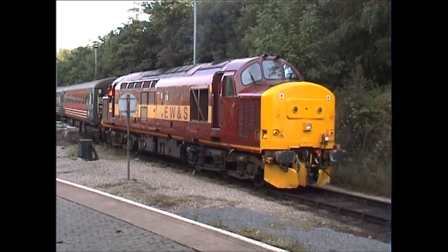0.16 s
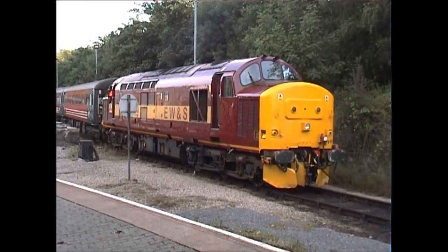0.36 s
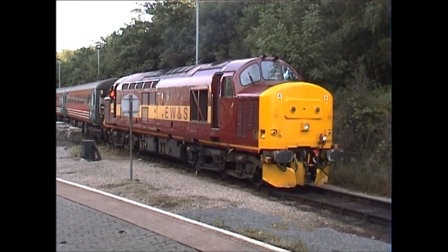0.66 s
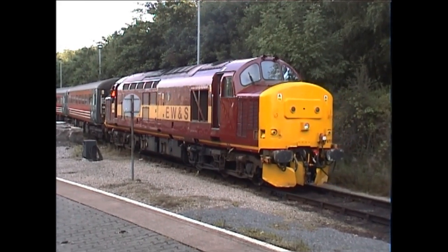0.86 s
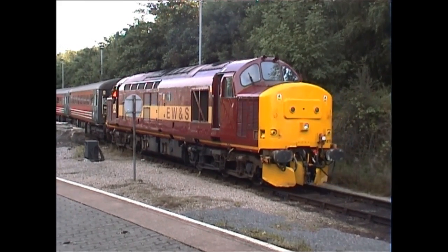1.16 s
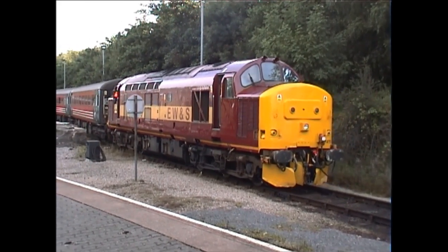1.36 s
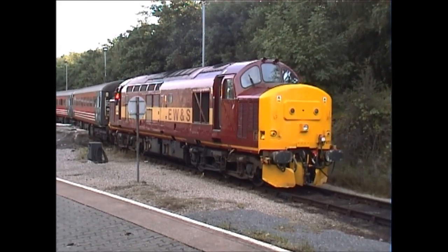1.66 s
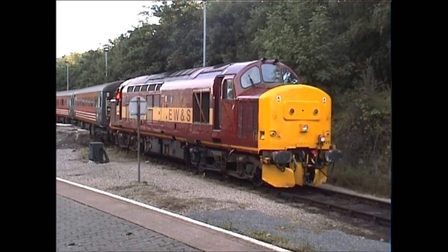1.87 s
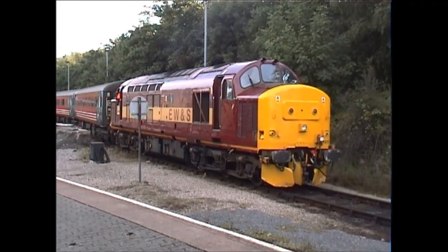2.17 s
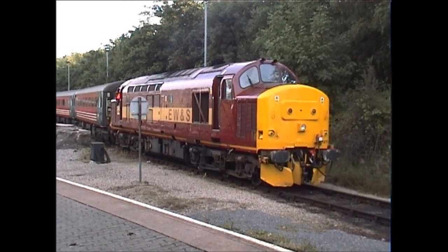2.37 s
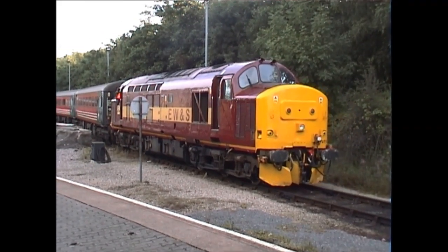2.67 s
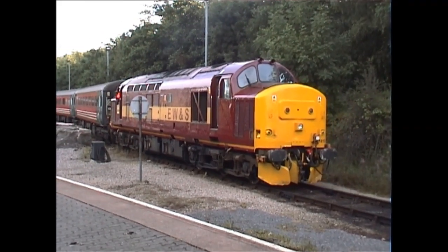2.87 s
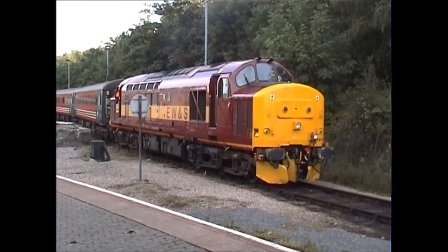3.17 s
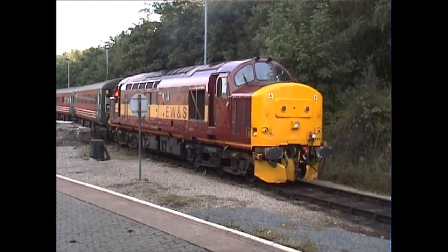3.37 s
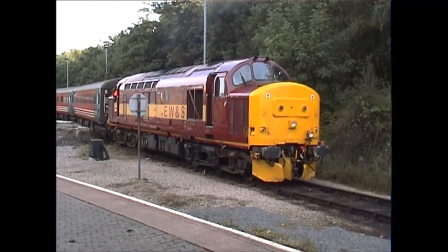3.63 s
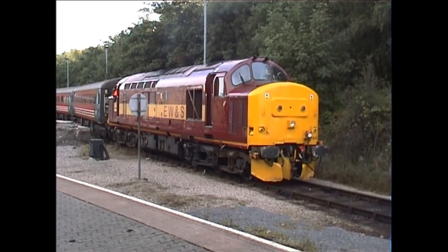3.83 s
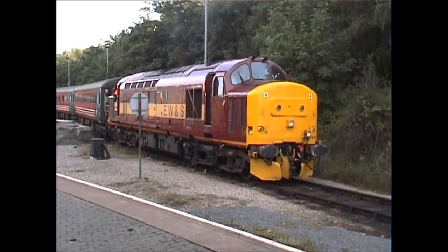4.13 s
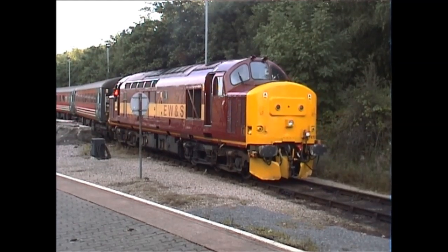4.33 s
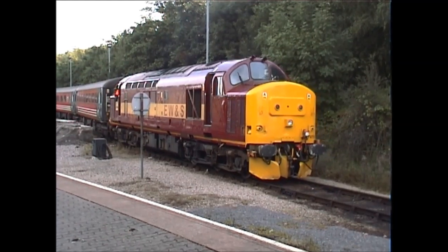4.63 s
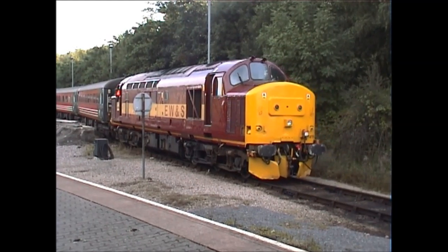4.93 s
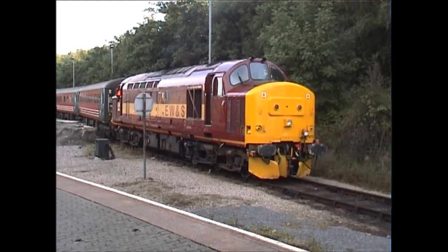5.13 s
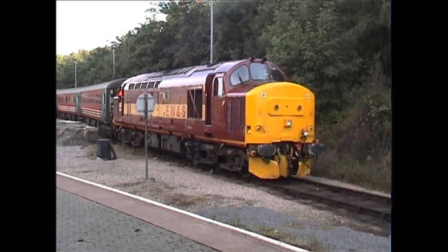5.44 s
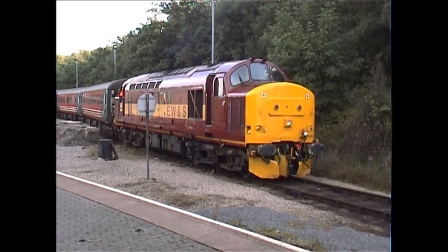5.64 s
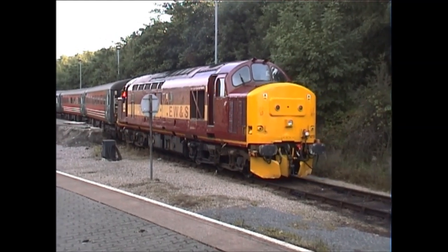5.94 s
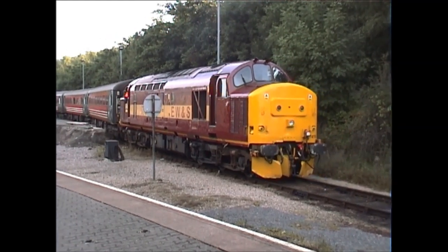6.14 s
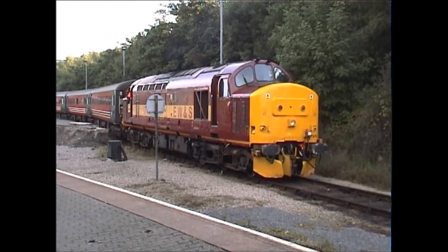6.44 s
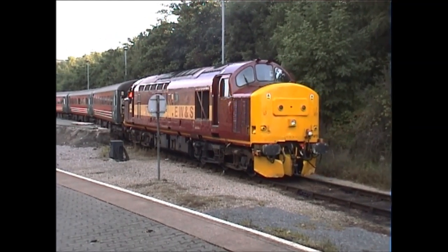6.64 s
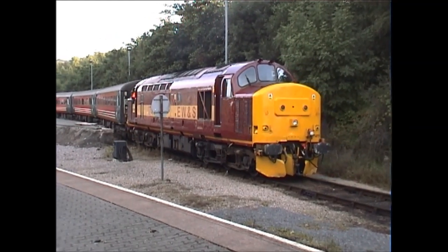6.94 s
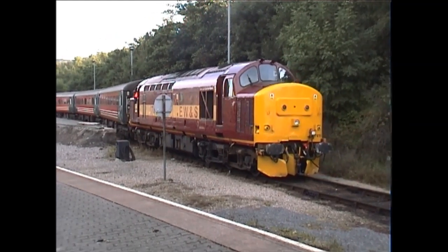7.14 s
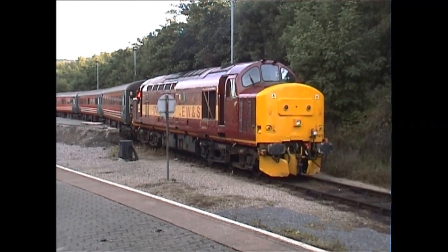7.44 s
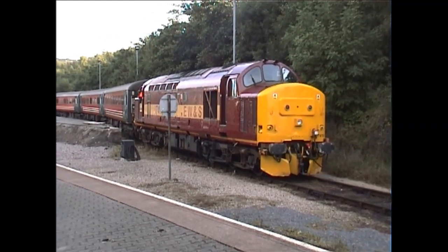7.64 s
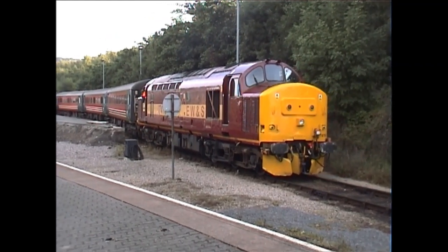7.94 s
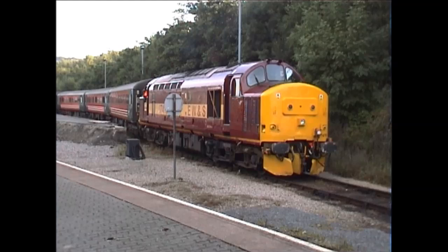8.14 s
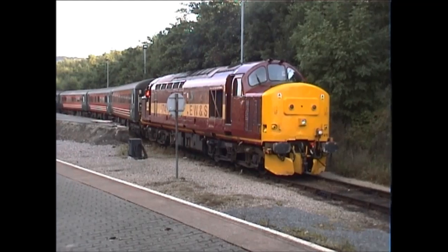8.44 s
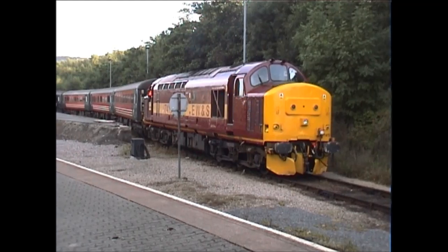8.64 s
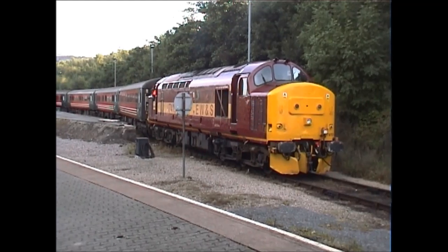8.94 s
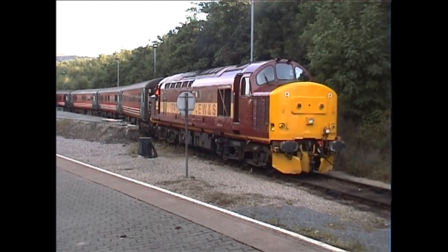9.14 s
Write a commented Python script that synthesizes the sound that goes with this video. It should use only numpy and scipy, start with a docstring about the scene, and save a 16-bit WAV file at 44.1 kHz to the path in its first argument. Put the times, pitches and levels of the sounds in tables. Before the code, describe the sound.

A diesel locomotive creeps along beside a station platform, its engine idling with an uneven throb, a steady whine and fan roar. A brief metallic clank comes at the start, followed by one short hiss of air and later two sharp ticks. High-pitched wheel squeals swell and break off throughout, with light grinding, growing busiest near the end. It is heard in stereo from the platform.

```python
"""A station platform, along which an idling twelve-cylinder diesel locomotive creeps, heard in stereo.
Uneven firing pulses excite the resonances of its stacks and panels, over generator whine and fan roar.
A brief metallic clank comes near the start, then one hiss of escaping air, and valves tick twice.
Above all this the wheels squeal: stick-slip friction on the rail drives each into self-excited
vibration at one of its own modes."""
import sys
import numpy as np
from scipy import signal
from scipy.fft import rfft, irfft
from scipy.io import wavfile
from scipy.ndimage import uniform_filter1d

SR = 44100
rng = np.random.default_rng(int(sys.argv[2]) if len(sys.argv) > 2 else 0)


def pcm_store(signal):
    """Save signal as 16-bit PCM."""
    levels = np.round(np.clip(np.atleast_2d(signal), -1, 1) * 32767)
    wavfile.write(sys.argv[1], SR, levels.astype(np.int16).T)


N = 410130
T = np.arange(N) / SR
GRID_S = np.arange(0, N / SR + .002, .001)  # envelope times, a millisecond apart

# noise spectrum of the clank, air, ticks and grinding: frequency_hz, relative_density_db
BRIGHT_SPECTRUM = [(900, 4), (2000, 3.5), (5000, 5), (8000, 5), (11000, -3), (15000, -30)]


def amp(db):
    """Amplitude ratio of a level in decibels."""
    return 10 ** (np.asarray(db) / 20)


def unit_rms(x):
    """Normalisation to unit power."""
    return x / np.sqrt(np.mean(x ** 2) + 1e-20)


def curve_at(points, hz):
    """Interpolation on a logarithmic frequency axis."""
    point_hz, value = np.transpose(points)
    return np.interp(np.log(hz + 1), np.log(point_hz + 1), value)


def smooth(x, ms):
    return np.interp(T, GRID_S, uniform_filter1d(x, size=ms))


def drift(hz, at=None):
    """Random modulation: noise of rms 1, low-passed at hz and read at the given samples."""
    pole = np.exp(-2 * np.pi * hz * 32 / SR)
    slow = unit_rms(signal.lfilter([1], np.poly([pole] * 3), rng.standard_normal(N // 32 + 2)))
    return np.interp((np.arange(N) if at is None else at) / 32, np.arange(len(slow)), slow)


def resonate(x, hz, width_hz):
    """Forced response of a damped two-pole resonator."""
    r = np.exp(-np.pi * width_hz / SR)
    return signal.lfilter([1 - r], [1, -2 * r * np.cos(2 * np.pi * hz / SR), r * r], x)


def noise(spectrum, patchy_db):
    """Partly coherent stereo noise of rms 1, its level drifting in patches of time and frequency."""
    # likeness of left and right: frequency_hz, correlation
    coherence = [(60, .98), (380, .82), (2380, .77), (15000, .88)]
    frames, hz = N // 256 + 5, np.fft.rfftfreq(1024, 1 / SR)
    a, b, c, d, patches = rng.standard_normal((frames, 513, 5)).T
    patches = unit_rms(uniform_filter1d(uniform_filter1d(patches, size=12, axis=0), size=14, axis=1))
    shared = curve_at(coherence, hz)[:, None]
    left, independent = a + 1j * b, c + 1j * d
    bins = np.array([left, shared * left + np.sqrt(1 - shared ** 2) * independent])
    bins *= amp(curve_at(spectrum, hz)[:, None] + patchy_db * patches)
    return unit_rms(signal.istft(bins, nperseg=1024, noverlap=768)[1][:, :N])


def roar():
    """Fan turbulence and rolling contact radiate steady broadband noise."""
    # fans and rolling: frequency_hz, relative_density_db
    roar_spectrum = [(20, -46), (59, -22), (130, -19), (160, 0.5), (330, -5), (530, -12.5), (800, -3.5),
                     (1300, -16), (1600, -11), (3950, -26), (9100, -28.5), (11400, -36.5), (15400, -56)]
    return amp(-25) * noise(roar_spectrum, patchy_db=1.23)


def harmonic(cycles, order, rms_db, wobble_turns=0):
    """A sinusoid locked to a multiple of the engine's cycle rate."""
    return np.sqrt(2) * amp(rms_db) * np.cos(2 * np.pi * (order * cycles + rng.random() + wobble_turns))


def drone(cycles):
    """Periodic engine motion radiates a harmonic series."""
    # successive harmonics of the cycle rate: level_db
    order_levels = [-48.2, -60.0, -60.0, -47.8, -60.0, -57.9, -47.3, -54.9, -47.7, -34.3, -49.2, -42.7,
                    -44.7, -44.4, -46.2, -45.5, -42.8, -48.5, -43.2, -52.3, -46.8, -52.7, -44.5, -54.4,
                    -49.0, -46.3, -50.7, -40.8, -52.6]
    return sum(harmonic(cycles, order, db) for order, db in enumerate(order_levels, start=9))


def generator(cycles):
    """Passing slots make a whine of high harmonics, slightly modulated in level and phase."""
    # slot tones: cycle_multiple, level_db
    slot_tones = [(102, -33.5), (136, -47), (170, -34), (204, -42.5)]
    return sum(harmonic(cycles, order, db + 1.5 * drift(6), .0013 * order * drift(2.5))
               for order, db in slot_tones)


def exhaust(cycles):
    """Impulse excitation: each firing rings stacks and panels with a thump and a dying burst of gas."""
    # exhaust beats in firing order: strength_db
    cylinders = [-6, -6, -8, 1, -5, -4, -5, 5, -3, -4, -7, 3.5]
    # stack and panel resonances: pitch_hz, width_hz, level_db, strength_exponent, beats_ahead
    resonances = [(228.5, 20.7, -31.5, 0.28, 0), (306.6, 44.6, -29, 1.02, 0), (639.4, 48, -33, 0.16, 4),
                  (973, 59, -36.5, 1.45, 4)]
    beat = np.floor(cycles * len(cylinders) + .15 + .04 * drift(12)).astype(int)  # firing times scatter
    scatter_db = 1.2 * rng.standard_normal(N)[beat]
    thumps = np.diff(beat, prepend=beat[0])
    gas = signal.lfilter([1], [1, -np.exp(-1 / (.015 * SR))], thumps) * rng.standard_normal(N)
    pulses = 1.7 * unit_rms(thumps) + unit_rms(gas)
    out = 0
    for hz, width_hz, db, exponent, ahead in resonances:
        strength = amp(np.array(cylinders)[(beat + ahead) % len(cylinders)] + scatter_db)
        drive = np.gradient(pulses * strength ** exponent)
        ringing = resonate(resonate(drive, hz, 1.5 * width_hz), hz, 1.5 * width_hz)
        out += amp(db) * unit_rms(ringing)
    return out


def engine():
    """Superposition of three crank-locked sources and the roar, a little louder on the left."""
    # idle speed, two crank turns to a cycle: time_s, cycle_rate_hz
    speed = [(1, 3.6373), (3, 3.6335), (5, 3.6312), (7, 3.6361)]
    # level difference between the ears: frequency_hz, left_minus_right_db
    balance = [(60, 2.5), (380, 1), (2380, 1), (15000, 4.5)]
    cycles = np.cumsum(np.interp(T, *np.transpose(speed))) / SR
    sound = drone(cycles) + generator(cycles) + exhaust(cycles) + roar()
    balance_db = curve_at(balance, np.fft.rfftfreq(N, 1 / SR))
    return irfft(rfft(sound) * amp(np.outer([.5, -.5], balance_db)), N)


ATTACK_DB_PER_S, RELEASE_DB_PER_S = 1600, 750


def arch(start, swell, fall, peak_db):
    """Envelope in dB: a rounded arch between exponential growth and decay."""
    past_peak = GRID_S - start - swell
    from_peak = np.minimum(abs(past_peak) / np.where(past_peak < 0, swell, fall), 1)
    ends_db = np.maximum(ATTACK_DB_PER_S * (start - GRID_S), RELEASE_DB_PER_S * (past_peak - fall))
    return peak_db - 8.5 * from_peak ** 1.34 - np.maximum(ends_db, 0)


def clank_air_and_ticks():
    """Broadband transients: a metallic clank, a turbulent air jet, valve ticks that ring a housing."""
    # the brief clank, then the hiss of escaping air: start_s, swell_s, fall_s, peak_db
    bursts = [(.238, 0.012, 0.05, -28), (2.24, 0.083, 0.26, -26.5)]
    # valve ticks: start_s, level_db, t60_ms
    ticks = [(3.164, -15, 6), (5.988, -19, 5)]
    envelope = smooth(sum(amp(arch(*burst)) for burst in bursts), ms=4)
    housing = 0
    for start, db, t60_ms in ticks:
        age = np.maximum(T - start, 0)
        snap, tail = amp(-60e3 * age / t60_ms), .29 * amp(-60 * age / .09)
        envelope += (T > start) * amp(db) * (snap + tail)
        housing += amp(db + 7.5 - 60 * age / .0061) * np.sin(2 * np.pi * 2500 * age)
    return noise(BRIGHT_SPECTRUM, patchy_db=1.5) * envelope + housing


def grinding(rubbing):
    """Sliding friction makes a hiss that grows with the strength of the rubbing."""
    return amp(-31) * noise(BRIGHT_SPECTRUM, patchy_db=5.5) * uniform_filter1d(rubbing, size=900) ** .81


def wheel_for(hz):
    """Each wheel has its own band of natural frequencies; the first match takes the pitch."""
    # ringing band of each wheel: low_hz, high_hz
    bands = [(4450, 4680), (5150, 5475), (5475, 5685), (5685, 6050), (6050, 6400), (2700, 2950),
             (2200, 2550), (1500, 1800), (9000, 9700), (4100, 5150)]
    return next((k for k, (low, high) in enumerate(bands) if low <= hz < high), len(bands) - 1)


def friction(wheel):
    """Mode competition: the strongest event of the moment sets a wheel's gain and pitch."""
    # squeals that swell and break off: start_s, swell_s, fall_s, peak_db, pitch_hz
    squeals = [(0.0, 0.009, 0.061, -24.1, 2385), (0.242, 0.022, 0.026, -18.7, 5228),
               (0.334, 0.029, 0.02, -24.8, 6119), (0.409, 0.046, 0.052, -27.0, 6155),
               (0.522, 0.078, 0.07, -24.5, 1645), (0.534, 0.035, 0.081, -23.8, 6161),
               (0.889, 0.014, 0.013, -15.5, 5680), (0.927, 0.006, 0.008, -16, 5690),
               (0.946, 0.015, 0.049, -18.8, 5670), (0.964, 0.073, 0.023, -22.9, 2441),
               (0.975, 0.032, 0.015, -16.0, 4569), (1.074, 0.041, 0.07, -18.9, 5417),
               (1.103, 0.038, 0.038, -11.5, 5621), (1.187, 0.055, 0.049, -11.6, 5609),
               (1.228, 0.023, 0.067, -23.6, 2427), (1.234, 0.041, 0.032, -17.8, 5741),
               (1.245, 0.026, 0.058, -12.0, 4556), (1.303, 0.087, 0.038, -10.3, 5608),
               (1.358, 0.017, 0.055, -20.9, 5751), (1.428, 0.052, 0.075, -28.5, 2412),
               (1.544, 0.02, 0.02, -21.8, 5747), (1.567, 0.078, 0.093, -31.5, 2400),
               (1.573, 0.049, 0.084, -12.6, 4570), (1.707, 0.015, 0.061, -19.7, 5738),
               (1.733, 0.02, 0.026, -17.6, 4584), (1.843, 0.026, 0.02, -19.6, 5702),
               (1.872, 0.038, 0.058, -16.6, 5454), (1.898, 0.055, 0.046, -19.2, 5744),
               (2.191, 0.052, 0.151, -21.5, 5781), (2.313, 0.035, 0.038, -11.7, 4565),
               (2.354, 0.046, 0.023, -26.1, 4288), (2.389, 0.055, 0.046, -10.6, 4563),
               (2.508, 0.061, 0.035, -12.0, 4557), (2.604, 0.07, 0.11, -10.7, 4537),
               (2.786, 0.023, 0.044, -36, 5062), (3.2, 0.035, 0.067, -22.5, 5384),
               (3.35, 0.017, 0.03, -27, 4592), (3.578, 0.01, 0.033, -18.5, 4535),
               (3.611, 0.046, 0.232, -7.7, 4515), (3.759, 0.104, 0.038, -15.7, 5350),
               (3.956, 0.058, 0.067, -16.2, 4557), (4.22, 0.023, 0.087, -18.2, 4545),
               (4.58, 0.064, 0.09, -21.8, 4546), (4.93, 0.04, 0.09, -31.2, 2835),
               (5.1, 0.02, 0.023, -18.8, 4546), (5.19, 0.032, 0.084, -15.5, 4530),
               (5.361, 0.044, 0.064, -13.1, 4521), (5.642, 0.064, 0.049, -20.0, 4545),
               (5.759, 0.052, 0.032, -16.4, 4529), (5.886, 0.061, 0.023, -19.6, 4535),
               (5.973, 0.055, 0.099, -21.7, 4556), (6.043, 0.026, 0.041, -26.7, 6135),
               (6.049, 0.015, 0.052, -21.5, 5305), (6.084, 0.02, 0.032, -24.4, 4394),
               (6.116, 0.075, 0.064, -19.4, 5601), (6.139, 0.052, 0.023, -23.6, 6128),
               (6.223, 0.055, 0.049, -20.5, 5428), (6.487, 0.07, 0.029, -29.9, 2823),
               (6.585, 0.03, 0.035, -22, 4555), (6.644, 0.015, 0.029, -30.9, 4286),
               (6.647, 0.029, 0.07, -32.4, 2813), (6.647, 0.052, 0.023, -14.0, 4557),
               (6.664, 0.023, 0.032, -20.9, 6145), (6.722, 0.139, 0.015, -16.2, 4566),
               (6.832, 0.119, 0.064, -26.6, 6138), (6.911, 0.023, 0.029, -28.8, 2822),
               (6.966, 0.041, 0.032, -33, 2829), (7.021, 0.061, 0.046, -20.1, 5570),
               (7.108, 0.09, 0.058, -21.7, 6172), (7.207, 0.075, 0.026, -12.1, 4575),
               (7.396, 0.075, 0.035, -13.0, 5553), (7.488, 0.046, 0.035, -12.9, 4535),
               (7.541, 0.116, 0.087, -13.1, 5523), (7.57, 0.046, 0.049, -8.8, 4519),
               (7.573, 0.078, 0.026, -32.0, 2318), (7.695, 0.041, 0.026, -20.2, 4540),
               (7.706, 0.049, 0.073, -25.4, 6167), (7.819, 0.11, 0.078, -9.3, 5528),
               (7.854, 0.078, 0.102, -14.0, 4570), (8.034, 0.096, 0.046, -15.9, 4569),
               (8.081, 0.058, 0.2, -7.8, 5524), (8.208, 0.07, 0.067, -11.0, 4561),
               (8.316, 0.046, 0.026, -12.3, 5359), (8.359, 0.148, 0.032, -15.6, 4555),
               (8.365, 0.02, 0.026, -18.4, 5541), (8.397, 0.084, 0.035, -20.8, 5353),
               (8.533, 0.058, 0.07, -10, 5343), (8.588, 0.029, 0.049, -19.8, 4535),
               (8.771, 0.023, 0.1, -34.5, 5014), (9.027, 0.017, 0.06, -32.0, 5026),
               (9.189, 0.049, 0.046, -18.0, 4527)]
    # chirps of light rubbing, and one brief, high metallic ring over an early squeal:
    # start_s, end_s, level_db, pitch_hz
    faint_tones = [(0.26, 0.81, -34, 6165), (2.08, 2.38, -35.5, 6160), (5.28, 6.53, -38, 6160),
                   (7.58, 8, -37.5, 6170), (0.06, .7, -33, 5750), (0.94, 1.066, -30, 5700),
                   (1.5, 2, -31.5, 5720), (2.36, 2.64, -34, 5690), (1.4, 1.65, -31, 5630),
                   (4.05, 4.25, -35, 5630), (4.73, 5.1, -34, 5625), (5.43, 5.68, -32, 5660),
                   (6.4, 6.8, -30.5, 5650), (6.89, 7.3, -30.5, 5630), (8.76, 9.05, -36, 5610),
                   (9.14, 9.24, -35, 5620), (.99, 2.75, -32, 5415), (2.75, 4.6, -38, 5410),
                   (3.19, 3.3, -39, 5670), (.17, .45, -36.5, 5300), (4.74, 5.24, -35, 5405),
                   (4.8, 5.62, -39, 5420), (5.72, 6.62, -35.5, 5400), (7.24, 8.3, -32.5, 5380),
                   (4.8, 4.92, -32.5, 4562), (7.77, 7.86, -27, 4543), (9.1, 9.2, -30, 4546),
                   (7.13, 7.22, -32, 4570), (8.8, 8.93, -34, 4550), (6.83, 6.93, -38, 2400),
                   (6.55, 7.3, -42.5, 4940), (3.07, 3.33, -39.5, 4760), (5.55, 7.6, -40.5, 5790),
                   (7.93, 8.15, -38.5, 2260), (.243, .28, -34, 10430), (5.89, 6.08, -30, 5620),
                   (0.69, .96, -42.5, 9370)]
    ring_db_per_s, faint_end_db_per_s = 55, 260
    chirp_db = 2.5 * drift(9, GRID_S * SR)
    levels, pitches = [], []
    for start, swell, fall, db, hz in squeals:
        if wheel_for(hz) == wheel:
            since_end = GRID_S - start - swell - fall
            free_ring_db = np.where(since_end > 0, db - 19 - ring_db_per_s * since_end, -200)
            levels.append(np.maximum(arch(start, swell, fall, db), free_ring_db))
            pitches.append(hz)
    for start, end, db, hz in faint_tones:
        if wheel_for(hz) == wheel:
            ends_db = np.maximum(ATTACK_DB_PER_S * (start - GRID_S), faint_end_db_per_s * (GRID_S - end))
            easing_db = -4.5 * ((GRID_S - start) / (end - start) - .5)
            levels.append(db + chirp_db + easing_db - np.maximum(ends_db, 0))
            pitches.append(hz)
    level_db = np.max(levels, axis=0)
    pitch_hz = np.array(pitches)[np.argmax(levels, axis=0)]
    # a wheel catching from silence starts sharp and settles as it passes -42 dB
    rising = np.clip(np.gradient(level_db, GRID_S) / RELEASE_DB_PER_S, 0, 1) ** 3
    sharp = .04 * rising / (1 + amp(level_db + 42) ** 2)
    return smooth(amp(level_db), ms=4), smooth(pitch_hz * (1 + sharp), ms=9)


def squeal(gain, hz, overtones_db, pan_db, lead_us, roughness):
    """Stick-slip locks onto one wheel mode: pure when loud, wavering and chattering when faint."""
    at = np.flatnonzero(gain > amp(-56))
    gain, hz = gain[at], hz[at]
    loose = roughness / (1 + (gain / amp(-23)) ** 2)
    waver_hz = (16 * loose + 4 * roughness) * drift(12.25, at) + 14 * loose * drift(40.2, at)
    phasor = np.exp(2j * np.pi * np.cumsum(hz + waver_hz) / SR)
    gain = np.sqrt(2) * gain * amp((4.04 * loose + 1.22) * drift(35.4, at))
    # rail roughness broadens the tone
    grit = 1 + (.012 * roughness + .44 * loose) * (drift(125, at) + 1j * drift(125, at))
    gain /= 1 + (amp(-59) / gain) ** 2  # a wheel barely rubbing falls silent
    # overtones vanish when the tone is faint, grow more slowly when it is loud, and flutter
    overtone_gain = gain / np.sqrt(gain / amp(-10.5) + .26) / (1 + (amp(-34) / gain) ** 2)
    overtone_gain *= amp(3 * drift(19.4, at)) * (1 + .33 * roughness * drift(120, at))
    lead_rad = 2 * np.pi * hz.mean() * lead_us * 1e-6
    out = np.zeros((2, N))
    for ear, side in enumerate((.5, -.5)):
        # the moving train reflects differently to each side
        reflection = .19 * (drift(9.6, at) + 1j * drift(7.2, at))
        partial = (grit + reflection) * phasor * np.exp(1j * side * lead_rad)
        out[ear, at] = gain * amp(side * pan_db) * partial.real
        for db in overtones_db:
            partial *= phasor
            out[ear, at] += overtone_gain * amp(db) * partial.real
    return out


def wheels():
    """Friction-excited vibration: wheels squeal from the left, right and centre; the first three grind."""
    # one row a wheel: overtone_weights_db, left_minus_right_db, left_lead_us, roughness
    voices = [([-13, -33.5], 4.1, 27, .48), ([-19], 0.44, -25, .9), ([-19.5], .3, -17.5, 0.93), ([-18.5],
              .3, -18, 0.825), ([-30], -3.5, 0, 0.44), ([-2, -2.5, -9, -31], 0, 0, .9), ([-16.5],
              3.6, 0, 0.685), ([], 0, 0, 0.37), ([], 0, 0, 0.48), ([-15], 1.8, 0, 0.54)]
    drives = [friction(wheel) for wheel in range(len(voices))]
    rubbing = sum(gain for gain, hz in drives[:3])
    return grinding(rubbing) + sum(squeal(*drive, *voice) for drive, voice in zip(drives, voices))


def scene():
    """The sound pressures of the sources add linearly."""
    return engine() + wheels() + clank_air_and_ticks()


def record(dry):
    """The converter clips at full scale; a low-pass filter then limits the band."""
    low_pass = signal.firwin(511, 15585, window=("kaiser", 9), fs=SR)
    return signal.oaconvolve(np.clip(dry, -1, 1), low_pass[None], "same")


dry = scene()
out = record(dry)
pcm_store(out)
```